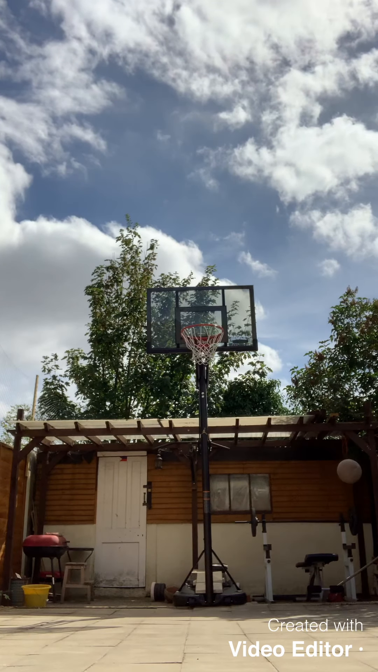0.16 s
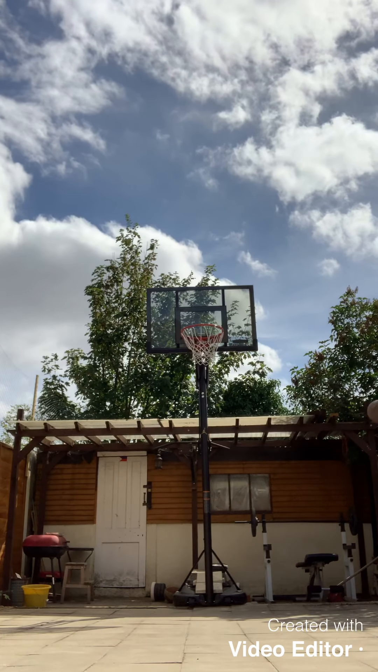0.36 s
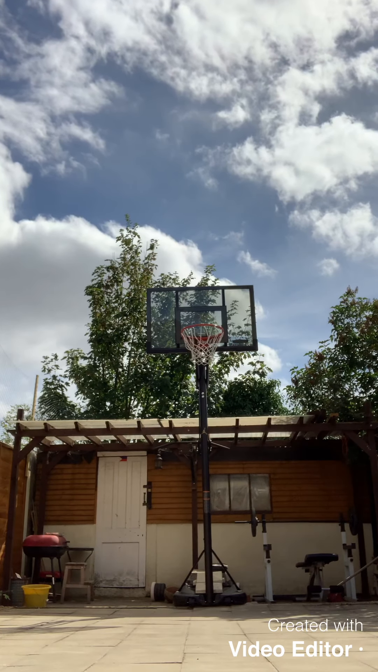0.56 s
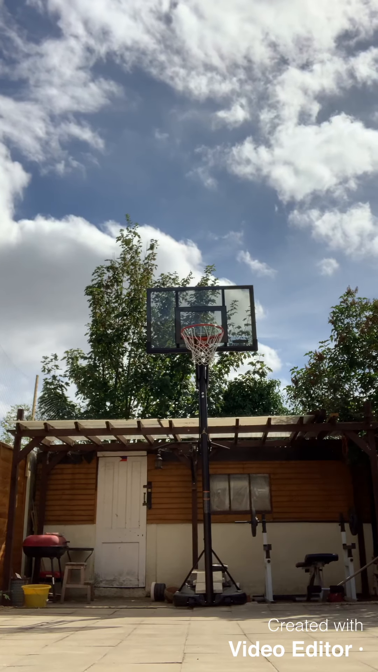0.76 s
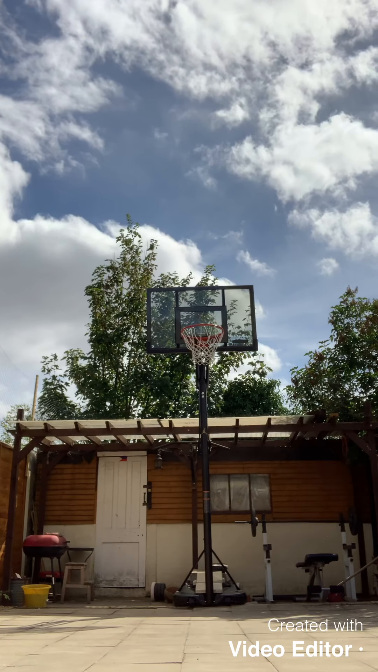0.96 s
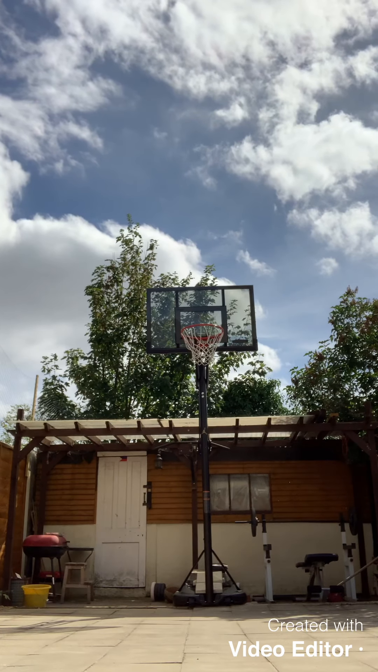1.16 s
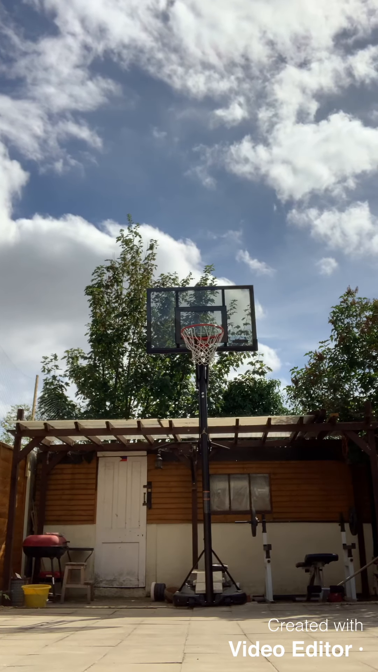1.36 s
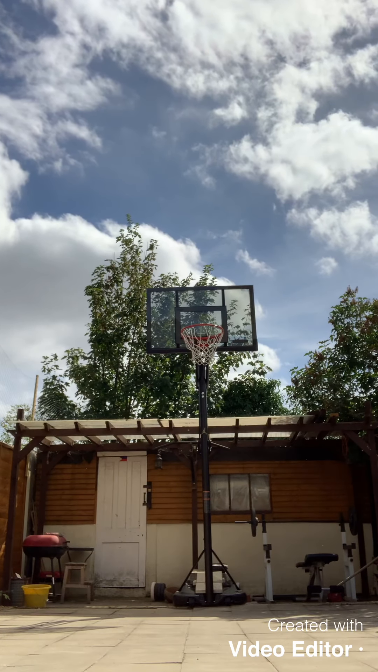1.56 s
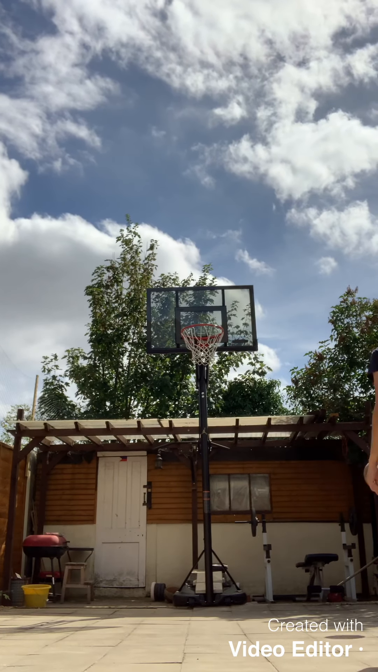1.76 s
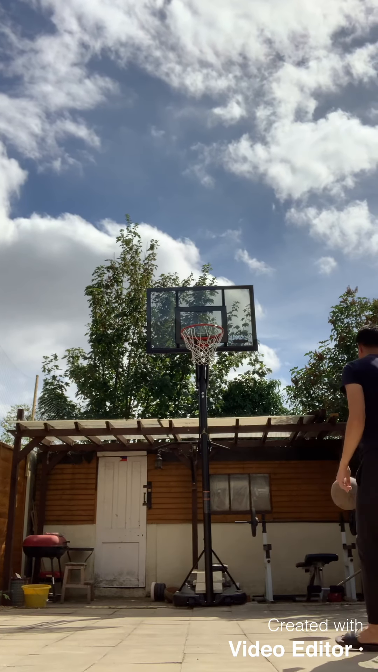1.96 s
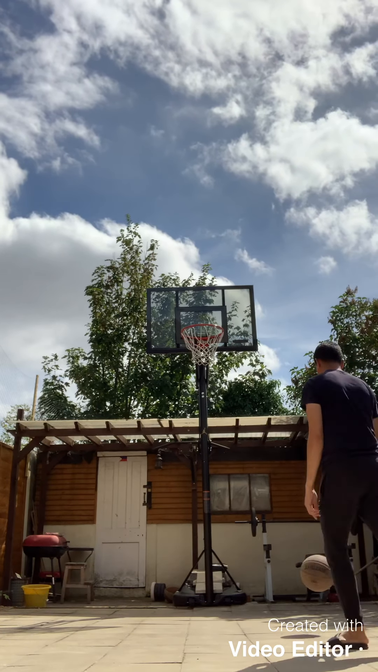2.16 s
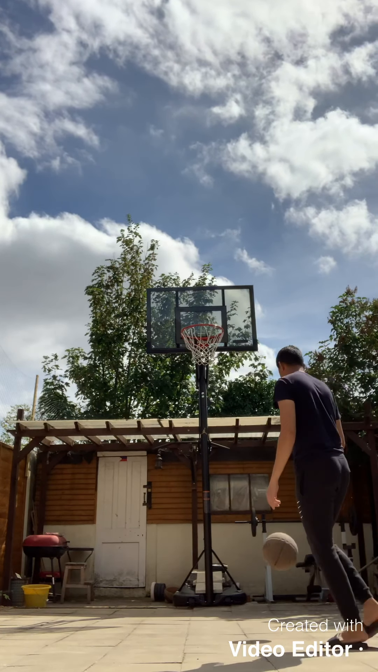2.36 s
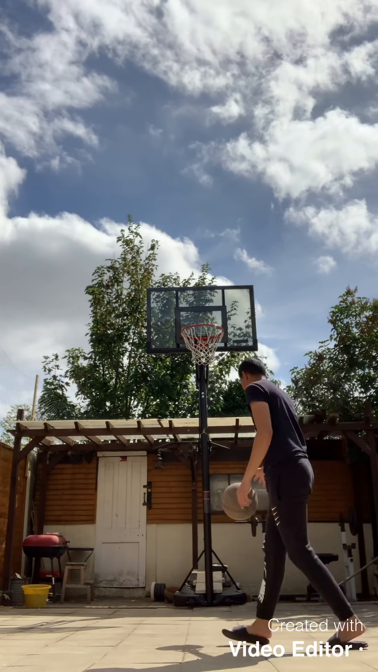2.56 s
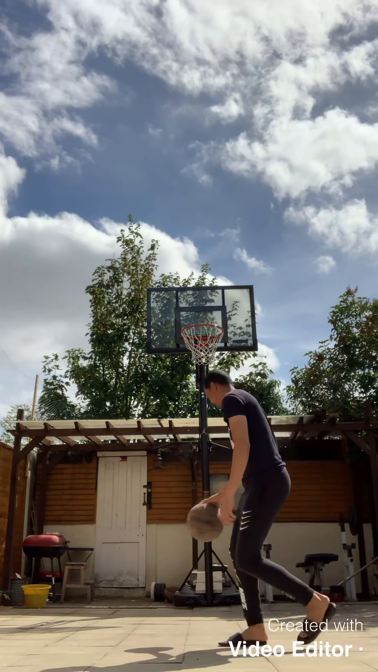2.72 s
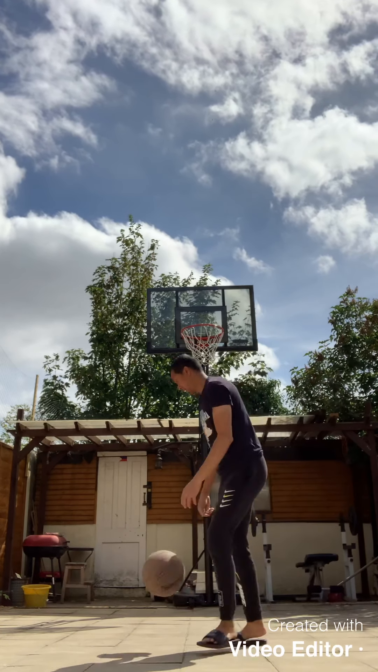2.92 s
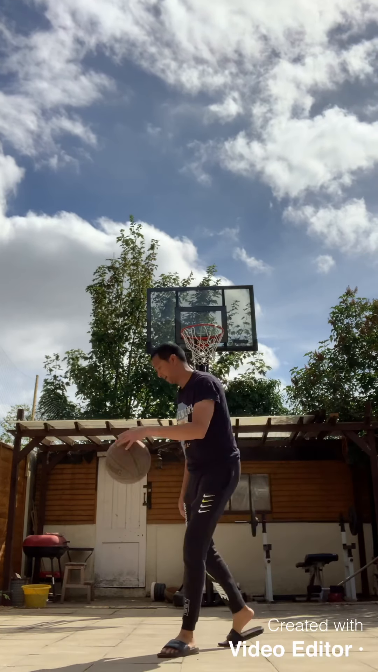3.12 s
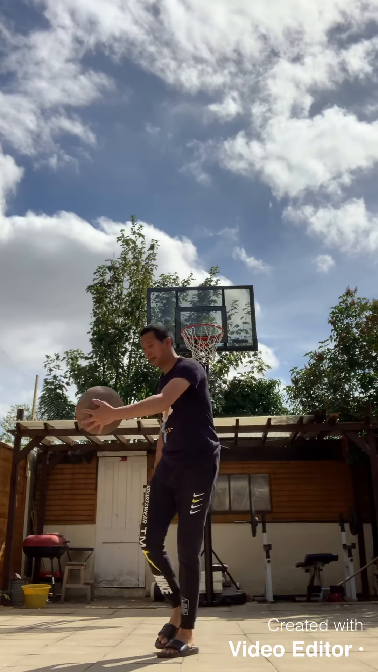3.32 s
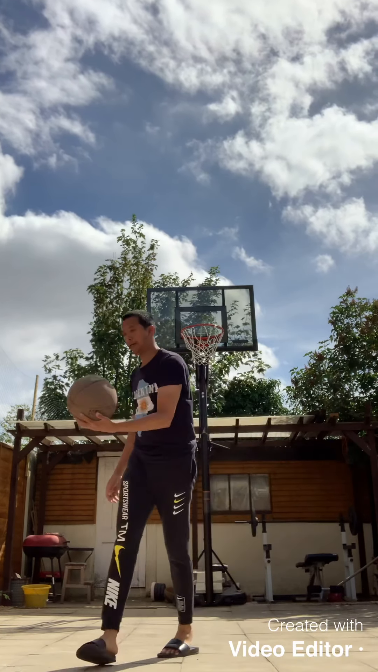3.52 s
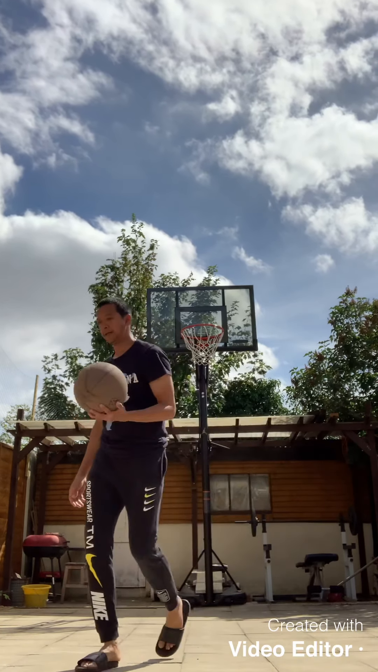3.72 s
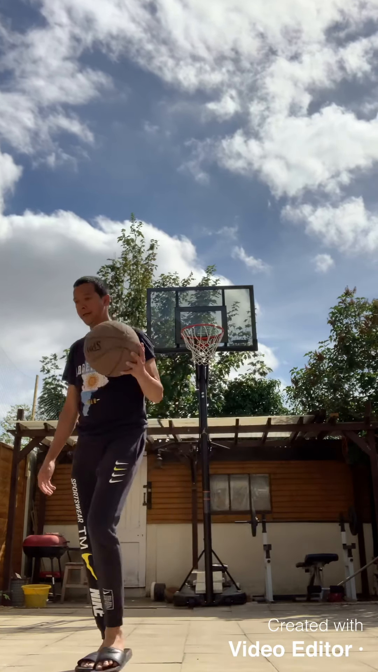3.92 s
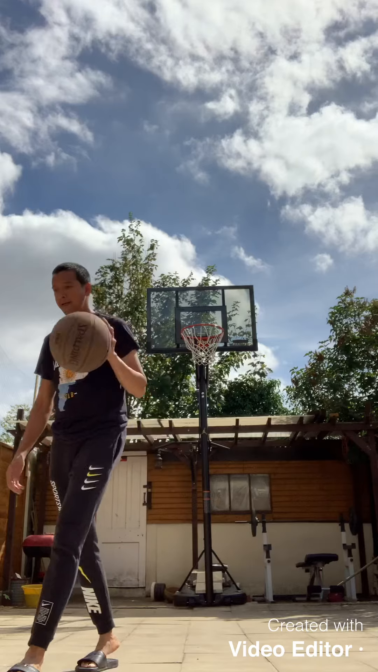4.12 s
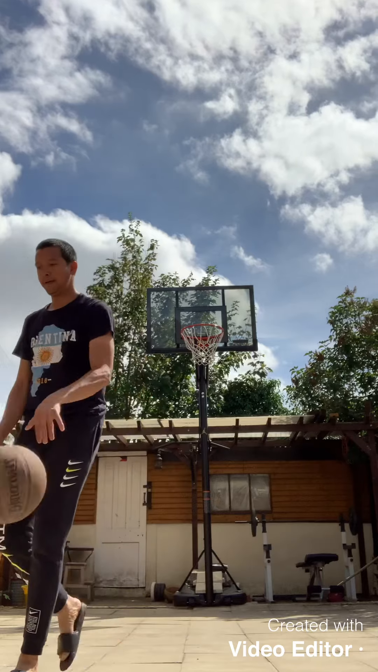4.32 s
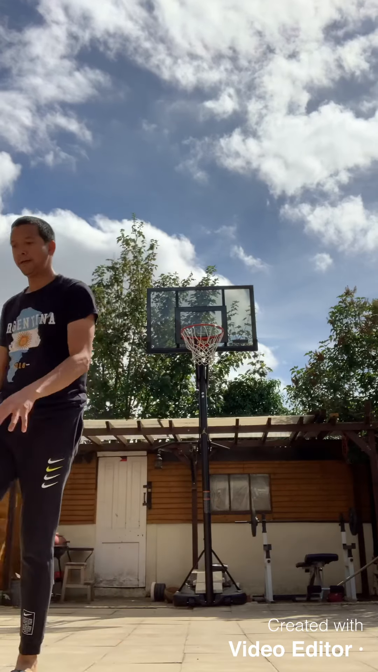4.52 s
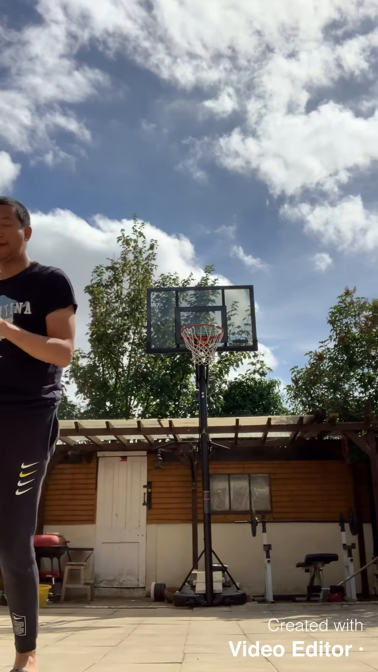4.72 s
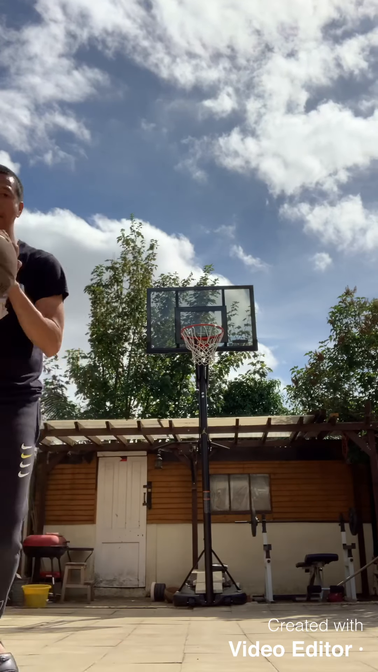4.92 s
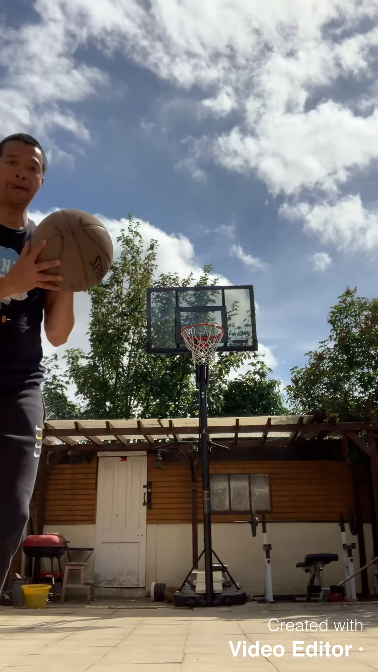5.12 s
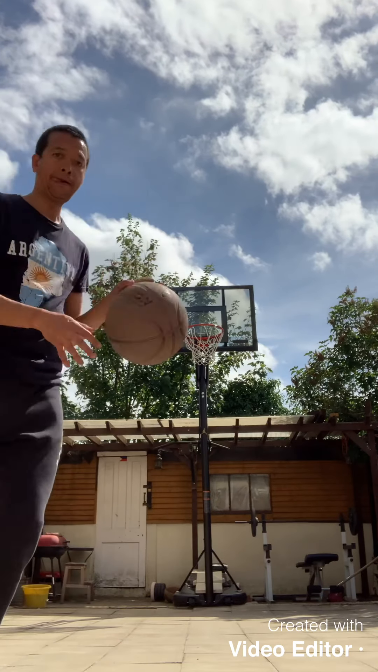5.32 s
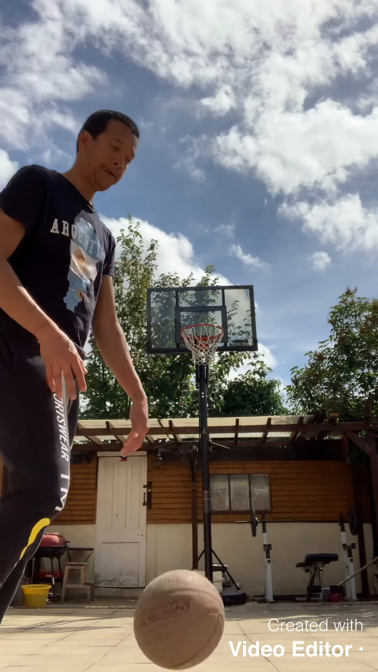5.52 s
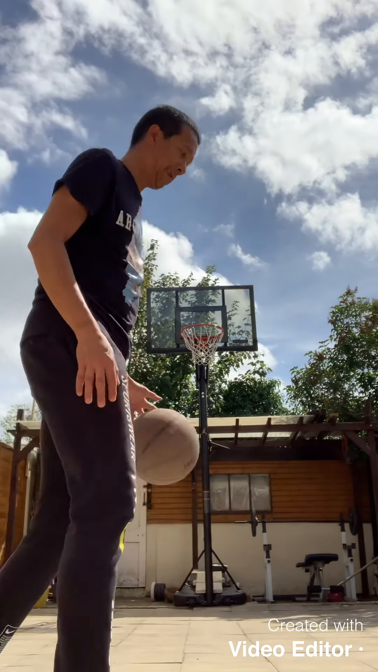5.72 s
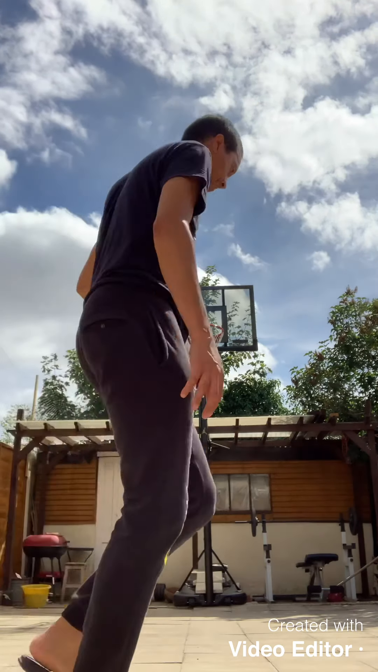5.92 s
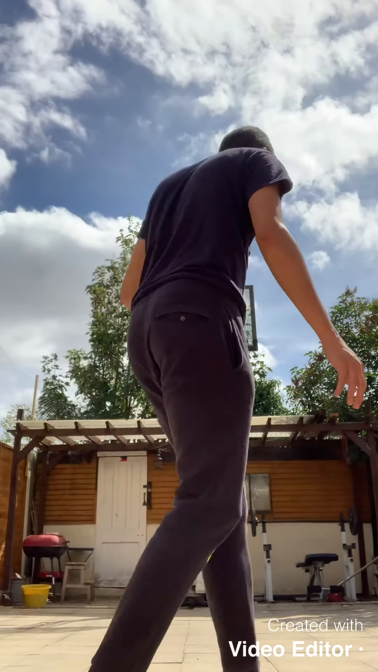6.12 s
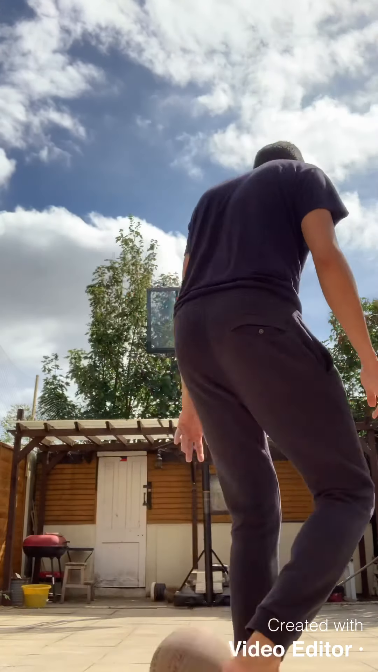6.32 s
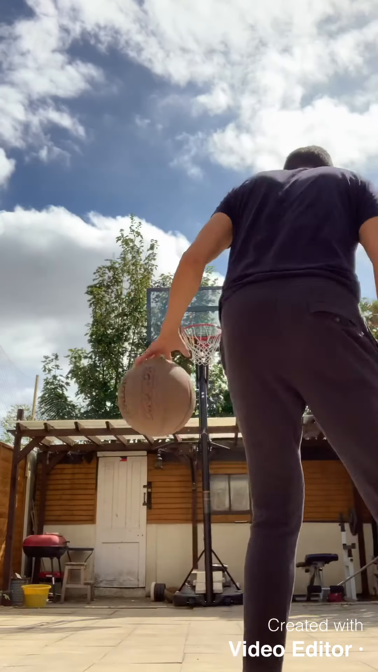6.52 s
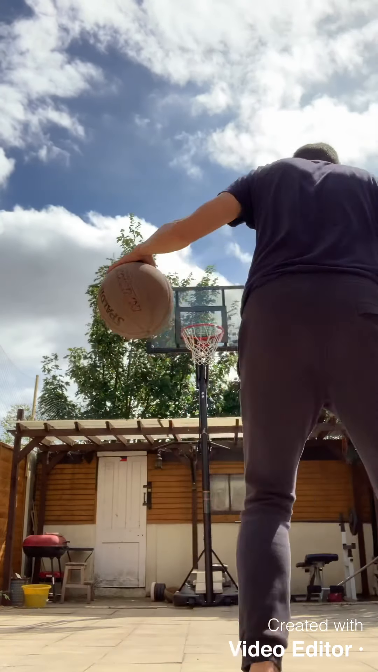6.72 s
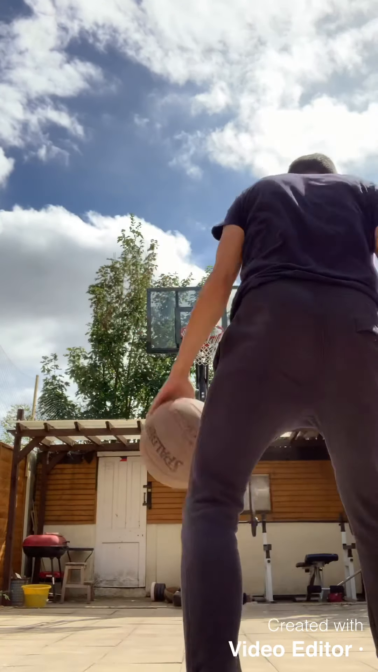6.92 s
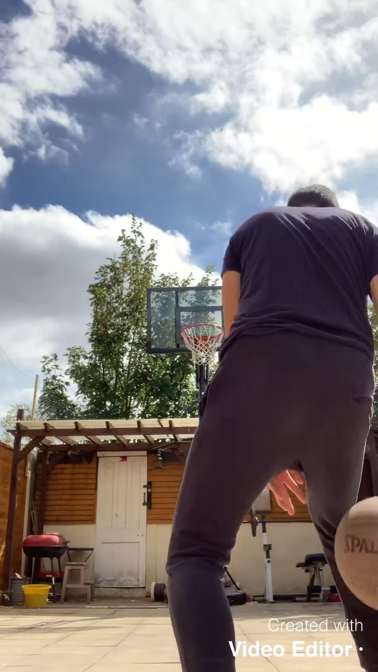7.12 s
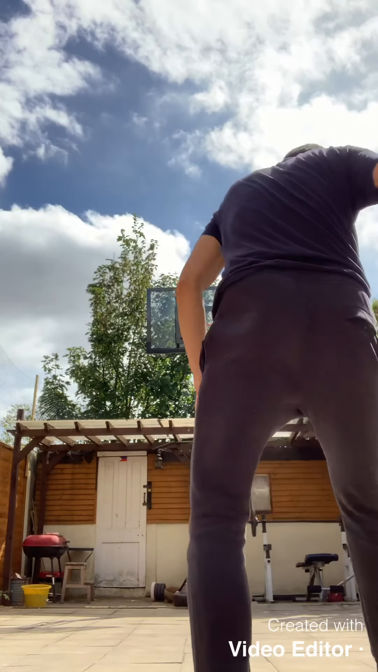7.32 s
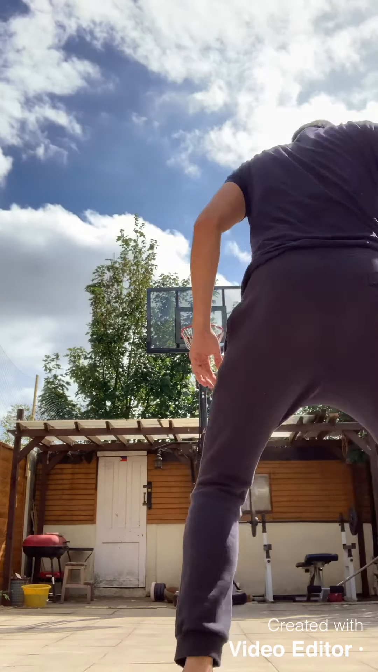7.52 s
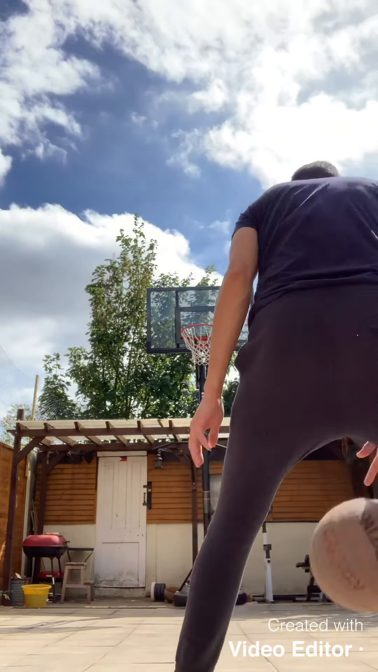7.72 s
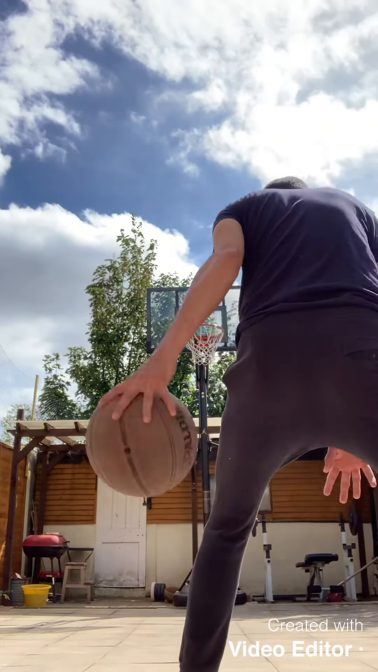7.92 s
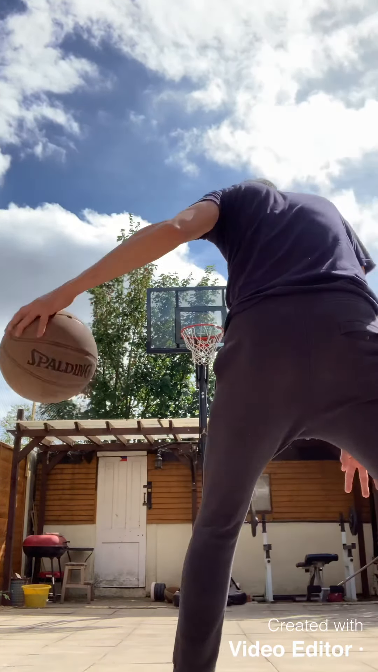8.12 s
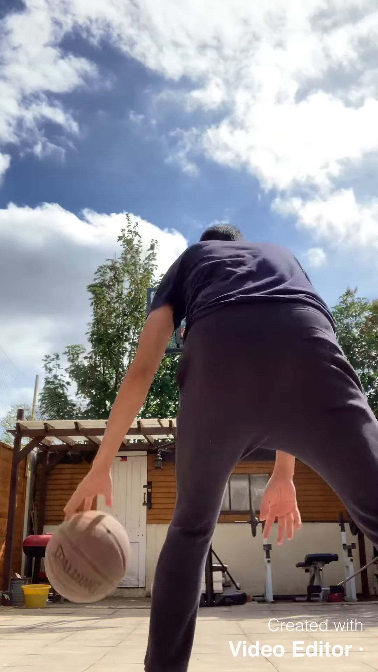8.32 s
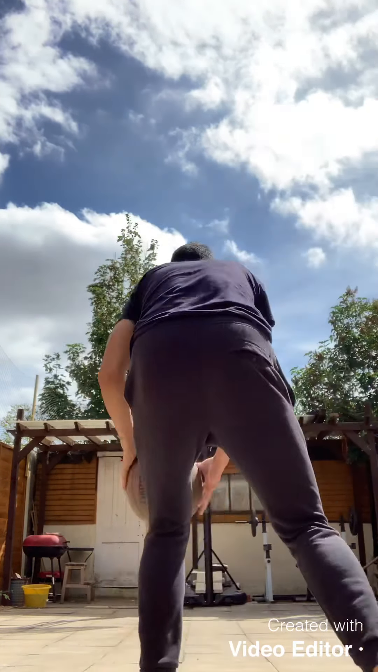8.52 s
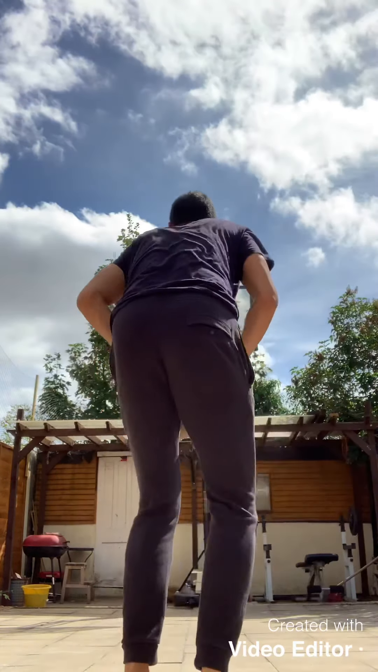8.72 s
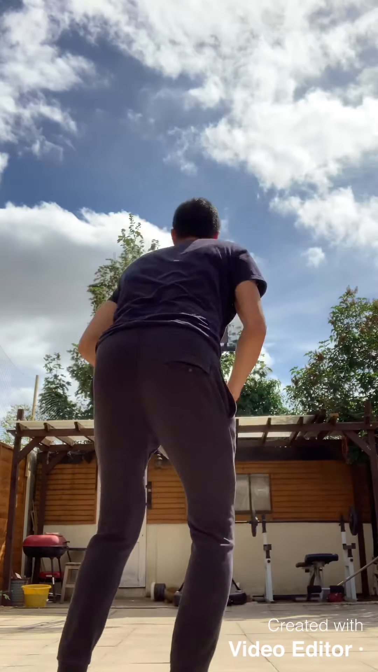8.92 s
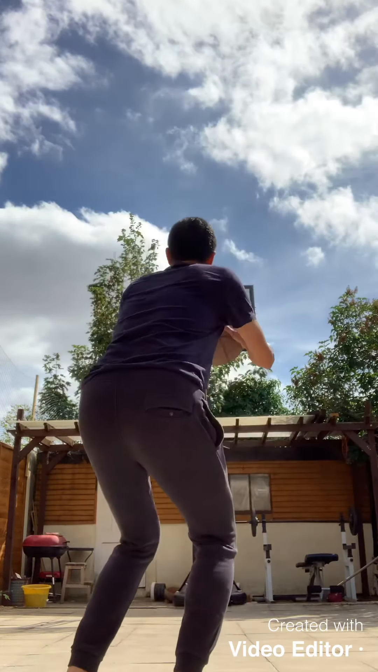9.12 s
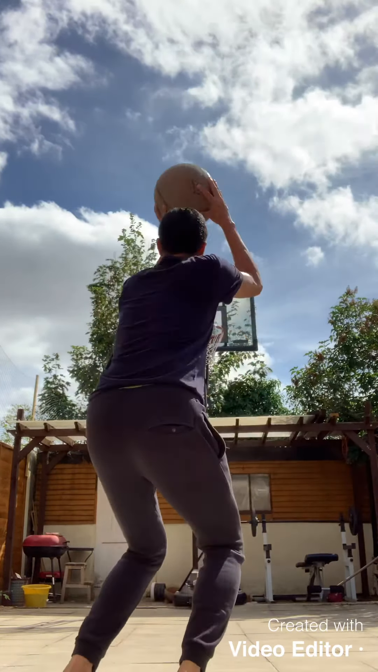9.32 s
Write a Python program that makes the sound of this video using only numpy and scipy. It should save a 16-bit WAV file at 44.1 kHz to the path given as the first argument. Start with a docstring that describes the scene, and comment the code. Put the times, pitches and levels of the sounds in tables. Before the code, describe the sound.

A close stereo microphone outdoors hears a single ball being dribbled on hard paving. The first bounce is already ringing out at the start; later ones grow into a steadier run, with scuffing soles, grit ticks and hand slaps between. A hard cracking smack comes late, then a last bounce, a catch and footfalls. House walls throw back brief bright echoes over soft traffic rumble, leaf rustle and barely heard bird whistles.

```python
"""Basketball on a walled patio

A ball is dribbled on paving between house walls. Each bounce sums squeezed-air slap, damped modes of the
air inside and a thud of sagging pitch; decaying noise gives the wall echoes. Sandals scuff as shaped noise;
hands, soles and heels strike as damped modes, with noise ticks of grit. Filtered noise makes far
traffic and leaves, wavering sines a faint bird. Two ports in a small body hear the scene in stereo.
"""
import sys
import numpy as np
from scipy import signal
from scipy.fft import rfft, irfft, next_fast_len
from scipy.io import wavfile
from scipy.ndimage import uniform_filter1d, map_coordinates

SR = 44100
rng = np.random.default_rng(int(sys.argv[2]) if len(sys.argv) > 2 else 0)


def inscribe(sig):
    """Save sig as 16-bit PCM at rate SR to the path in sys.argv[1].

    A 1-D sig is mono; a 2-D sig holds one channel per row.
    Samples are clipped to [-1, 1] before scaling.
    """
    pcm = np.round(np.clip(np.atleast_2d(sig).T, -1, 1) * 32767)
    wavfile.write(sys.argv[1], SR, pcm.astype(np.int16))


N = 412776

# Traffic and leaves, relative spectrum: (frequency [Hz], density [dB per Hz])
AIR_SPECTRUM = [(12, -14.5), (20, -16.5), (49, 0), (77, -6.5), (120, -9), (138, -12), (210, -8), (285, -16),
                (446, -16), (527, -20.5), (825, -19.5), (897, -18.5), (16000, -60.5)]
# Drift of the background: (time [s], rumble level [dB], rustle level before a fixed lift [dB])
AIR_LEVEL = [(0.0, -46, -55.5), (0.63, -51, -58), (1.07, -47.5, -56.5), (3.2, -48.5, -57),
             (7.5, -48, -56.5), (8.5, -44, -56), (9.36, -47, -59)]
# Left-right likeness of the background: (frequency [Hz], correlation)
AIR_LIKENESS = [(60, 0.95), (180, 0.96), (550, 0.031), (1650, 0.13), (4970, 0.32), (15000, 0.13)]
# Far whistles, before flutter: (time [s], length [s], frequency [Hz], level [dB])
BIRD_WHISTLES = [(.07, 0.11, 2830, -63.5), (0.58, .13, 2520, -67), (4.6, 0.2, 2860, -69),
                 (4.65, 0.08, 3550, -69), (4.85, 0.2, 2870, -70)]
# Soles dragged on slabs: (time of full level [s], rise [s], hold [s], grit level [dB], rubber over grit [dB])
SCUFFS = [(0.186, 0.033, 0.0027, -59.5, 5), (0.341, 0.024, .003, -53.5, -6),
          (0.823, 0.028, 0.0044, -26, -11.5), (0.99, 0.077, .02, -54, -7), (1.546, 0.091, .01, -54, 1),
          (1.64, .008, 0.033, -48, -11), (1.91, .01, 0.12, -49.5, -8), (2.174, 0.12, 0.032, -47, -1),
          (2.525, .01, 0.16, -53, 0.5), (2.993, 0.073, 0.023, -47.5, 0), (3.187, 0.1, 0.027, -53, -2),
          (3.431, .008, 0.018, -48, -5), (3.49, .01, 0.094, -50.5, -2), (4.572, 0.059, 0.013, -36.5, -12),
          (4.74, 0.16, 0.078, -61, 3.5), (4.935, .02, 0.018, -68, 2), (5.098, 0.021, 0.025, -41, -9),
          (5.134, 0.022, 0.0094, -42.5, 0), (5.31, 0.031, 0.018, -53, -7), (5.832, 0.23, 0.024, -60.5, 7.5),
          (6.066, 0.012, 0.025, -45, 0), (6.468, 0.026, 0.081, -50.5, 6.5),
          (6.669, 0.018, 0.0067, -68, 16.5), (6.77, 0.024, .004, -38, -7),
          (6.782, 0.005, 0.0044, -40.5, -9), (6.869, 0.0093, 0.01, -46, -6), (6.9, .015, 0.025, -42, -7),
          (7.233, 0.074, 0.089, -47, -8), (7.495, 0.033, 0.0075, -39.5, 9.5),
          (7.663, 0.011, 0.14, -41.5, -1), (7.91, 0.14, 0.049, -50.5, -8), (8.073, 0.037, 0.04, -43.5, -4),
          (8.189, 0.0094, 0.036, -48.5, 7.5), (8.356, 0.012, 0.02, -43, 12),
          (8.732, 0.062, 0.012, -40.5, -5), (8.863, 0.047, 0.009, -54, 12.5)]
# Relative spectra of the drags: (frequency [Hz], density [dB per Hz])
GRIT_SPECTRUM = [(2000, -32), (3500, -0.5), (4800, 2.5), (5600, -6), (6500, 2), (9000, -5.5), (12000, 5.5),
                 (15500, 2.5)]
RUBBER_SPECTRUM = [(300, -3), (800, 8.5), (1500, 11), (2500, 12), (4000, 11.5), (6000, -3.5)]
# Grit and finger ticks, before a fixed lift: (time [s], level [dB])
TICKS = [(0.339, -67), (0.8302, -20), (.843, -33), (1.625, -32), (1.897, -39), (2.506, -40), (2.5696, -35),
         (2.621, -51), (2.666, -42.5), (3.1752, -49), (3.434, -39), (3.4752, -25), (3.5706, -34.5),
         (3.711, -43), (4.522, -27), (5.086, -36), (5.828, -44), (6.055, -37), (6.7441, -61),
         (6.8732, -29.5), (7.657, -45.5), (8.077, -27.5), (8.184, -52), (8.6253, -50)]
# Heels landing: (time [s], level [dB], lowest mode [Hz])
HEELS = [(0.875, -23.5, 65), (1.898, -33, 51.7), (2.571, -33.5, 167), (3.202, -52, 59.2), (4.748, -34, 190),
         (5.082, -37, 205), (6.047, -30.5, 189), (8.174, -41, 160), (8.529, -21.5, 214),
         (8.887, -25, 113.6), (9.049, -24, 56), (9.177, -30, 58)]
# Cupped hands or soles smacking, a quick echo of one smack, and the middle-pitched ring of some grit ticks:
# (time [s], level [dB], cup mode [Hz], T60 [s], yard over direct [dB])
SMACKS = [(0.829, -34, 1340, 0.11, 10), (.843, -30.5, 500, .05, 13), (2.563, -31, 1250, 0.011, 6.5),
          (2.618, -30.5, 2010, 0.016, 1), (2.645, -34.5, 470, 0.092, 1), (3.434, -50, 2150, 0.033, -1),
          (4.752, -32.5, 434, 0.14, 11), (5.148, -22, 420, 0.014, 3.5), (6.464, -25, 910, 0.017, 7),
          (6.52, -24, 367, 0.051, -1.5), (6.799, -21.5, 413, 0.013, 4.5), (6.929, -17, 424, 0.0085, 1.5),
          (7.496, -1.5, 1110, 0.016, 0.5), (7.4992, -18, 1110, 0.018, -2), (7.5067, -17.5, 1250, .04, -3.5),
          (8.077, -47.5, 1960, 0.028, 10.5), (8.122, -42, 2300, 0.037, 3), (8.185, -32, 367, 0.041, 9),
          (8.505, -13.5, 311.5, 0.039, 7.5), (8.507, -23, 1185, 0.03, -3), (8.624, -36, 2140, 0.023, 3.5),
          (8.866, -19.5, 1007, 0.024, -0.5)]
# Bounces: (time [s], slap [dB], thud [dB], thud swell [ms], thud pitch [Hz], thud lag [ms],
# thud let-go [ms], ring [dB], wall echo delay [ms], wall echo [dB], treble [dB], yard [dB],
# yard middle [dB], yard treble [dB])
BOUNCES = [(-.057, -3.5, -8.5, 7.5, 102, 2.5, 9.3, -31, 5, -5, -23, 9, -11, -31),
           (1.2985, -31.5, -5.5, 7.3, 113, 2.06, 8.3, -23, 1.6, -24, 4.5, 9.5, -3.8, 3),
           (2.2021, -13, -10, 5.6, 108, 2.7, 16, -24.5, 4.7, -11, 6, 7, 4.5, -27.5),
           (2.8304, -24, -4, 6.1, 123, 2.2, 15, -16, 11.5, -29, -4.5, 11.5, 0, -10),
           (4.4050, 3.5, -5.5, 2.4, 110, 2.65, 16, -11, 1.4, -10.5, -10.5, 11, 2, -0.5),
           (5.528, -9.5, -2.5, 5, 127.7, 3, 19, -13, 2.2, -18, 2.5, 6.5, -3, 6),
           (6.2993, -4.5, -4, 4.8, 106, 2.9, 12, -14, 1.8, -24, 4, 4, 0.5, 0),
           (7.0214, 4.5, -6, 2.6, 111, 2.13, 16, -16.5, 3.44, 3, -9, 11.5, 1.8, -6),
           (7.753, -11.5, -3, 3.9, 119, 2.22, 9.5, -14, 3.37, 4.5, 6, 9.5, -1.5, 5.5),
           (8.362, -10, -0.5, 5.3, 130, 3.63, 11, -16, 2.64, 1.5, 5.5, 11, 0, 4)]
# Modes of the ball's shell on the slab: (frequency [Hz], level [dB], T60 [s])
SHELL_MODES = [(94.7, 5, 0.044), (170.4, 5.5, 0.065), (251, -5.5, 0.1), (346, -9.5, 0.088),
               (431, -4, 0.051), (499, -9.5, 0.15)]
# Modes of the air in the ball, before scatter: (frequency [Hz], level [dB], T60 [s])
CAVITY_MODES = [(675, 9, 0.002), (936, -10.5, .12), (1159, -10.5, 0.17), (1250, -6, 0.19),
                (1550, 7.5, 0.013), (1665, -11.5, 0.09), (1920, -22, 0.054), (2253, -17, 0.2),
                (2446, -15.5, 0.099), (2670, -18, 0.2), (3280, -16.5, 0.082), (3640, -22, .09),
                (4190, -14.5, 0.13)]
# Noise of an impact, relative spectrum: (frequency [Hz], density [dB per Hz])
IMPACT_SPECTRUM = [(40, -12), (300, 9), (500, 2.5), (750, -12), (1100, 1.5), (2300, -4), (3300, -4.5),
                   (5000, -8.5), (8000, -16), (16000, -8.5)]
# Decay of the wall echoes: (frequency [Hz], T60 [s])
YARD_T60 = [(60, 0.55), (120, 0.23), (200, 0.32), (400, 0.39), (700, 0.43), (2000, 0.39), (6000, 0.35),
            (14000, 0.28)]
# Colour of the wall echoes: (frequency [Hz], level [dB])
YARD_COLOUR = [(50, -1), (120, -4), (200, -6.5), (400, 0), (700, 1), (2000, 0.5), (6000, -2.5), (14000, -2)]
# Left-right likeness of the wall echoes: (frequency [Hz], correlation)
YARD_LIKENESS = [(60, 1), (250, 1), (600, 0.16), (2000, 0.22), (3200, 0.045), (6000, 0.41), (12000, 1)]
# Left port against right: (frequency [Hz], phase lead [rad], level difference [dB])
PORTS = [(30, .2, 1.5), (150, .45, 2.5), (350, .9, 2.5), (900, .9, 4.5), (1400, .85, 2), (1900, 1.1, 0),
         (2900, 2.2, -1.5), (4000, 3.8, -.5), (5200, 5, 0), (6800, 6.2, 0), (7800, 8.3, 0), (9400, 9.5, 0),
         (11000, 10.5, 0), (13500, 12.4, 0), (16000, 12.6, 0)]
# Response to the half-sum of the ports: (frequency [Hz], gain [dB])
MID_RESPONSE = [(20, -45), (40, -1), (60, 0.5), (6000, -1.5), (8000, -8), (10000, -9), (13000, -11.5),
                (16000, -30)]
# Response to the half-difference of the ports: (frequency [Hz], gain [dB])
SIDE_RESPONSE = [(30, 2), (300, -2), (9000, -1), (11500, -10), (13000, -26), (16000, -19)]

TOP_HZ = 16600  # band limit
LEAD = SR // 4  # spare samples ahead of time zero, for a bounce already under way
HIT_T = np.arange(SR // 6) / SR  # time axis of one impact [s]
RISE_DB, FALL_DB_PER_S = 20, 218  # a drag climbs this far over its rise, then dies away at this speed
HEEL_TOP_RATIO = 2.75  # a heel's top mode over its lowest
PRESSED_HZ, SAG_S, CONTACT_S = 241, 0.0038, 0.0052  # extra pitch at first, its decay; time on the slab
THUD_T60_S = 0.11
SHELL_DB, SHELL_SCATTER_DB = -8, 1.5  # the shell under the thud; its scatter between bounces
CAVITY_SCATTER_DB, CAVITY_SPREAD = 2.5, 0.012  # the flexing ball varies mode strength and relative pitch
BOUNCE_YARD_DB = 1.5  # wall echoes against the direct sound of a bounce
NEAR_WALLS_DB, NEAR_WALLS_S = 3.5, 0.025  # the closest walls answer louder above the bass, this long
# A far wall answers late in the middle pitches: delay, pitch, lift of the tail, level of its clean copy
FAR_WALL_S, FAR_WALL_HZ, FAR_WALL_DB, FAR_COPY_DB = 0.0515, 1300, 5, -13


def amp(db):
    """Decibels to amplitude ratio."""
    return 10 ** (np.asarray(db) / 20)


def unit(x):
    """Normalization to unit RMS."""
    return x / np.sqrt(np.mean(x ** 2) + 1e-20)


def along(points, hz):
    """Interpolation of (frequency, value) points on a log frequency axis."""
    f, v = np.transpose(points)
    return np.interp(np.log(hz + 1), np.log(f + 1), v)


def curves(rows):
    """Linear interpolation to one value per sample for each column after the time."""
    s, *cols = np.transpose(rows)
    return [np.interp(np.arange(N) / SR, s, c) for c in cols]


def wobble(rate):
    """Spline through random knots, rate of them a second."""
    knots = rng.standard_normal(int(N * rate / SR) + 4)
    return map_coordinates(knots, [np.arange(N) * rate / SR])


def patches(shape, bins, frames):
    """Random field of unit RMS, smoothed over frequency bins and time frames."""
    field = uniform_filter1d(rng.standard_normal(shape), size=bins, axis=0)
    return unit(uniform_filter1d(field, size=frames, axis=1))


def likeness_angle(points, hz):
    """Mid-side mixing angle: the cosine of its double is the left-right correlation."""
    return np.arccos(np.clip(along(points, hz), -1, 1)) / 2


def filtered(x, response):
    """Linear filtering: the spectrum times a complex frequency response."""
    n = x.shape[-1]
    m = next_fast_len(n + 4096)
    return irfft(rfft(x, m) * response(np.fft.rfftfreq(m, 1 / SR)), m)[..., :n]


def delay(hz, seconds):
    """Pure delay as a phase proportional to frequency."""
    return np.exp(-2j * np.pi * hz * seconds)


def ring(modes, t, scatter_db, attack):
    """Modal synthesis: exponentially damped sines at freshly scattered strengths."""
    wave = 0
    for hz, db, t60 in modes:
        wave = wave + amp(db + scatter_db * rng.normal() - 60 * t / t60) * np.sin(2 * np.pi * hz * t)
    return wave * (1 - np.exp(-t / attack))


def add(track, s, sound):
    """Superposition: mix a sound in at s seconds."""
    part = track[:, LEAD + round(s * SR):][:, :sound.shape[-1]]
    part += sound[..., :part.shape[1]]


def air():
    """Broadband ambient noise: traffic rumbles and leaves rustle, in drifting patches."""
    rumble_db, rustle_db = curves(AIR_LEVEL)
    z = signal.stft(rng.standard_normal((2, N)), nperseg=512)[2]
    field = patches(z.shape[1:], bins=6, frames=14)
    pair = signal.istft(z * amp(2.0 * field), nperseg=512)[1][:, :N]

    def mid_side(hz):
        turn = likeness_angle(AIR_LIKENESS, hz)
        return amp(along(AIR_SPECTRUM, hz)) * [np.cos(turn), np.sin(turn)]

    mid, side = filtered(pair, mid_side)
    both = np.array([mid + side, mid - side]) * amp([[.6], [-.6]])  # slightly louder on the left
    swell = amp(1.3 * wobble(5))  # passing traffic
    low = filtered(both, lambda hz: 1 / (1 + (hz / 160) ** 4))
    return swell * amp(rumble_db) * unit(low) + amp(rustle_db + 8.0) * unit(both - low)


def birds():
    """Frequency and amplitude modulation: far whistles waver, blurred by the air on the way."""
    t = np.arange(N) / SR
    waver = np.cumsum(40 * wobble(80)) / SR  # cycles
    whistles = 0
    for s, length, hz, db in BIRD_WHISTLES:
        fade = np.clip(np.minimum(t - s, s + length - t) / 0.012, 0, 1)
        whistles = whistles + amp(db) * fade * np.sin(2 * np.pi * (hz * t + waver))
    return amp(3 * wobble(40)) * whistles


def drags():
    """Friction envelopes of grit and rubber: each drag rises, holds and fades, and powers add."""
    t, grit, rubber = np.arange(N) / SR, np.zeros(N), np.zeros(N)
    for s, rise, hold, db, dull_db in SCUFFS:
        climb_db = RISE_DB * np.clip(s - t, 0, 1) / rise
        fall_db = FALL_DB_PER_S * np.clip(t - s - hold, 0, 1)
        shape = amp(db - climb_db - fall_db)
        grit, rubber = np.hypot(grit, shape), np.hypot(rubber, amp(dull_db) * shape)
    return grit, rubber


def patchy(x, patchy_db):
    """Time-frequency modulation: random patches of gain."""
    z = signal.stft(x, nperseg=256)[2]
    field = patches(z.shape[-2:], bins=4, frames=5)
    return signal.istft(z * amp(patchy_db * field), nperseg=256)[1][..., :N]


def scuffs():
    """Sliding friction: grit crackles under a dragged sole; the rubber adds a duller rub."""
    grit_gain, rub_gain = drags()
    stones = 1 + 2.5 * (rng.random(N) < 2500 / SR) * rng.exponential(size=N)  # about 2500 a second
    grains = rng.standard_normal((4, N)) * stones * amp(0.83 * wobble(70))
    grains = patchy(grains, patchy_db=2.2)
    grit = unit(filtered(grains[:2], lambda hz: amp(along(GRIT_SPECTRUM, hz))))
    rub = unit(filtered(grains[2:], lambda hz: amp(along(RUBBER_SPECTRUM, hz))))
    near, spread = grit_gain * grit + rub_gain * rub
    return near + 0.4 * spread * [[1], [-1]]


def wall_levels(hz, t):
    """Reverberant decay in dB over frequency and time, each frequency at its own speed."""
    hz = hz[:, None]
    walls_db = 1.2 * rng.standard_normal(len(t))  # single walls stand out
    walls_db = walls_db + 1.5 * patches((len(hz), len(t)), bins=4, frames=3)  # each has its own colour
    far_pitch = np.log((hz + 1) / FAR_WALL_HZ) ** 2
    far_db = FAR_WALL_DB * np.exp(-((t - FAR_WALL_S) / 0.003) ** 2 - far_pitch)
    near_db = NEAR_WALLS_DB * np.exp(-(t / NEAR_WALLS_S) ** 2) * np.tanh(hz / 600) ** 2
    return walls_db + far_db + near_db + along(YARD_COLOUR, hz) - 60 * t / along(YARD_T60, hz)


def yard(x):
    """Convolution reverberation: a fresh tail of decaying noise stands for the wall echoes."""
    hz, t, z = signal.stft(rng.standard_normal((2, SR // 2)), SR, nperseg=256)
    turn = likeness_angle(YARD_LIKENESS, hz)[:, None]
    mid, side = z[0] * np.cos(turn), z[1] * np.sin(turn)
    pair = np.array([mid + side, mid - side])
    tail = signal.istft(pair * amp(wall_levels(hz, t)), SR, nperseg=256)[1]
    onset = np.clip(np.arange(tail.shape[1]) / SR / 0.0043, 0, 1)
    return signal.fftconvolve(x[None], tail * onset * 0.059, axes=1)


def impact_colour(hz):
    """Spectral shaping shared by impact noise and impact clicks."""
    return amp(along(IMPACT_SPECTRUM, hz))


def puff(t60):
    """Turbulent air at an impact: exponentially decaying coloured noise."""
    return unit(filtered(rng.standard_normal(len(HIT_T)), impact_colour)) * amp(-60 * HIT_T / t60)


def bang():
    """Impulse excitation: one coloured click, set late to leave room for the zero-phase filter."""
    return filtered(1.0 * (np.arange(len(HIT_T)) == 128), impact_colour)


def ticks(track):
    """Micro-impacts: grit and fingers tick as very short bright noise."""
    for s, db in TICKS:
        noise = np.convolve(rng.standard_normal(len(HIT_T)), [1, -.6], 'same')
        add(track, s, amp(db + 1.5 - 60 * HIT_T / 0.012) * noise)
        add(track, s, amp(db + 10.0) * yard(np.array([1, -.7])))


def heels(track):
    """Low-frequency modal impact: landing heels excite three damped modes."""
    for s, db, hz in HEELS:
        modes = [(hz, 0, .07), (hz * 1.53, -3, .05), (hz * HEEL_TOP_RATIO, -7, .04)]
        thump = amp(db) * ring(modes, HIT_T, 0.31, 0.28 / hz)
        add(track, s, thump)
        add(track, s, amp(-2.5) * yard(thump))


def smacks(track):
    """Cavity resonance: air trapped under a cupped hand or sole rings briefly; the same damped ring gives a
    quick echo of a smack and the middle-pitched body of some grit ticks."""
    click = bang()
    for s, db, hz, t60, yard_db in SMACKS:
        modes = [(hz * 0.803, -6, t60), (hz, 0, t60), (hz * 1.206, -5, t60),
                 (hz * 3.3, -14, t60), (170, -15, t60 * 3)]
        cup = ring(modes, HIT_T, 1.0, 1.42 / hz)
        add(track, s, amp(db) * (cup + 0.112 * puff(t60)))
        add(track, s + FAR_WALL_S, amp(db + FAR_COPY_DB) * cup)
        to_yard = cup * amp(-60 * HIT_T / 0.01) + hz / 900 * click
        add(track, s, amp(db + yard_db) * yard(to_yard))


def tilt(db, above_hz=3500):
    """First-order shelf: a cleaner contact is brighter."""
    return lambda hz: (1 + 1j * hz / above_hz * amp(db)) / (1 + 1j * hz / above_hz)


def thud(t, swell, hz, let_go):
    """Contact stiffening: the flattened ball booms high and sags in pitch; then only the shell rings on."""
    turns = hz * t + PRESSED_HZ * SAG_S * (1 - np.exp(-t / SAG_S))  # cycles
    release = np.exp(-(np.maximum(t - CONTACT_S, 0) / let_go) ** 2)  # the ball leaves the slab
    boom = (1 - np.exp(-t / swell)) * amp(-60 * t / THUD_T60_S) * release * np.sin(2 * np.pi * turns)
    return 1.78 * boom + amp(SHELL_DB) * ring(SHELL_MODES, t, SHELL_SCATTER_DB, 0.0063)


def slap_and_ring(slap_db, ring_db):
    """Air squeezed out at contact, and cavity modes of the air inside the ball."""
    squeezed = [(2300, -3, .0028), (5000, -1, .0018), (6500, 0, .0015), (12000, -8, .001)]
    slap = ring(squeezed, HIT_T, 1, .0001)
    cavity = [(hz * (1 + CAVITY_SPREAD * rng.normal()), db, t60) for hz, db, t60 in CAVITY_MODES]
    inside = 0.55 * ring(cavity, HIT_T, CAVITY_SCATTER_DB, 0.0004) + 2.2 * puff(0.01)
    return amp(slap_db) * slap + amp(ring_db) * inside


def bounces(track):
    """Impact of an elastic shell: slap, cavity ring and thud, reflected by the walls."""
    click = bang()
    for (s, slap_db, thud_db, swell_ms, pitch_hz, lag_ms, let_go_ms, ring_db, echo_ms, echo_db,
         treble_db, yard_db, yard_middle_db, yard_treble_db) in BOUNCES:
        bright = filtered(slap_and_ring(slap_db, ring_db), tilt(treble_db))
        echo = amp(echo_db) * filtered(bright, lambda hz: delay(hz, echo_ms / 1000) / (1 + 1j * hz / 4000))
        thud_t = np.maximum(HIT_T - lag_ms / 1000, 0)
        deep = amp(thud_db) * thud(thud_t, swell_ms / 1000, pitch_hz, let_go_ms / 1000)
        add(track, s, bright + echo + deep)

        far = filtered(bright + echo, lambda hz: 1 / (1 + 1j * hz / (2 * FAR_WALL_HZ)) ** 2)
        add(track, s + FAR_WALL_S, amp(FAR_COPY_DB) * far)

        to_yard = filtered(filtered(click, tilt(yard_middle_db, 1500)), tilt(yard_treble_db))
        bright_part = amp(-4.5 - 60 * HIT_T / 0.0028) * bright
        deep_part = amp(1.5 - 60 * HIT_T / 0.063) * deep
        deep_part = filtered(deep_part, lambda hz: delay(hz, .012))  # the boom returns from further off
        add(track, s, amp(BOUNCE_YARD_DB) * yard(amp(yard_db) * to_yard + bright_part + deep_part))


def hits():
    """Superposition of all impacts, each heard direct and through the yard."""
    track = np.zeros((2, N + LEAD))
    ticks(track)
    heels(track)
    smacks(track)
    bounces(track)
    return track[:, LEAD:]


def ports(x):
    """Diffraction: the small body turns the phase and shades the level differently at each port."""
    f, turn, db = np.transpose(PORTS)

    def half(hz):
        return np.exp(.5j * np.interp(hz, f, turn)) * amp(.5 * np.interp(hz, f, db))

    return filtered(x, lambda hz: np.array([half(hz), 1 / half(hz)]))


def scene():
    """Superposition of the ambient field and the near sources shaded by the ports."""
    return air() + birds() + ports(scuffs() + hits())


def record(dry):
    """Mid-side equalization of the ports, then soft saturation of peaks and a band limit."""
    mid = filtered((dry[0] + dry[1]) / 2, lambda hz: amp(along(MID_RESPONSE, hz)))
    side = filtered((dry[0] - dry[1]) / 2, lambda hz: amp(along(SIDE_RESPONSE, hz)))
    x = np.array([mid + side, mid - side])
    x = x / (1 + np.abs(x / .95) ** 6) ** (1 / 6)
    return filtered(x, lambda hz: hz < TOP_HZ)


dry = scene()
out = record(dry)
inscribe(out)
```